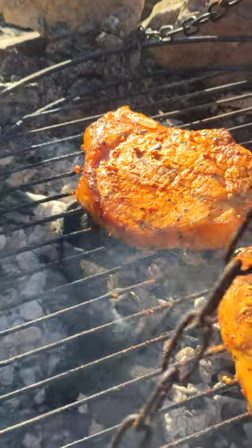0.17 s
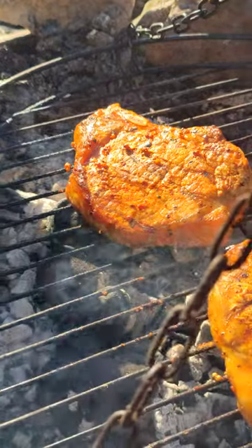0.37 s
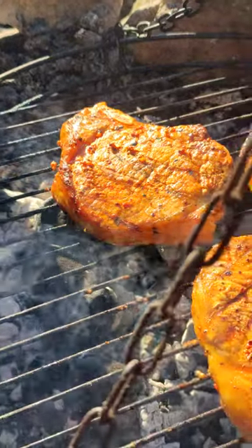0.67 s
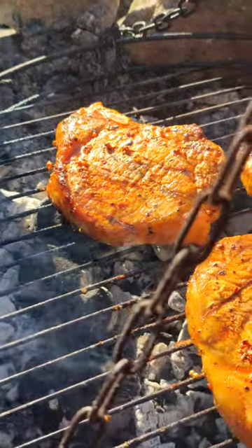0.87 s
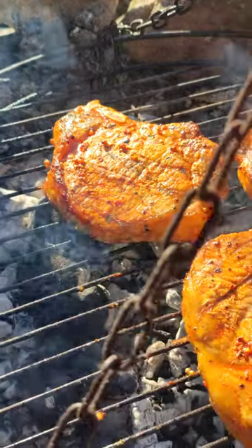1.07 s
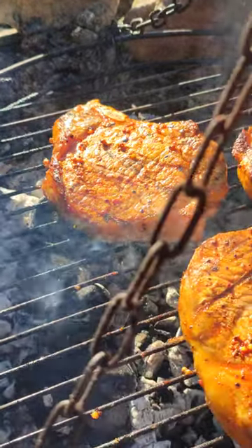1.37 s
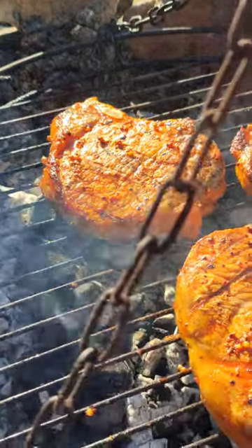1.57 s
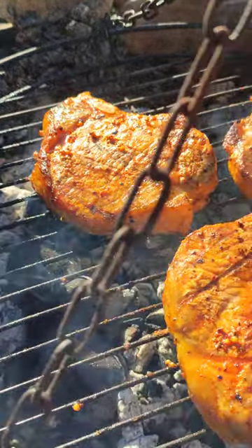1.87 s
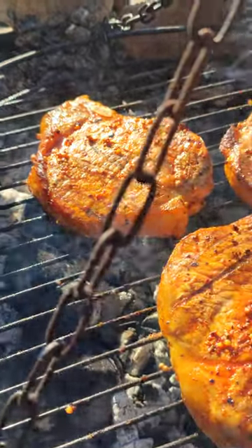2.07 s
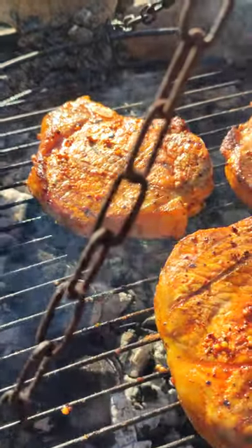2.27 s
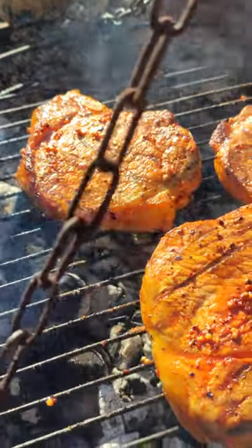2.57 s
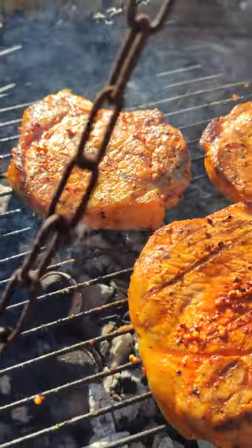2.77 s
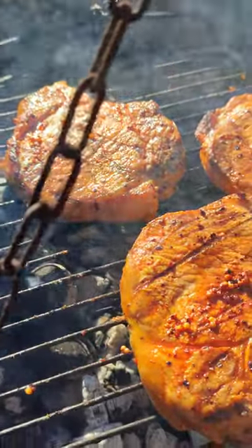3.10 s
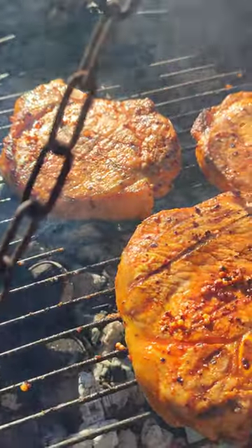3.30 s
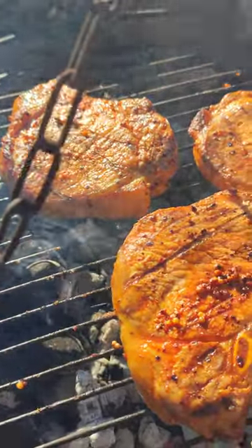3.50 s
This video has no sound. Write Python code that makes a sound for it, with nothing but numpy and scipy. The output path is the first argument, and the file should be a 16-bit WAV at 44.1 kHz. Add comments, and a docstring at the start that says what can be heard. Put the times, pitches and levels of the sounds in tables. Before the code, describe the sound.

Meat sizzles on a charcoal grill outdoors, close to a phone. Brief silence, then a quick fade-in by 0.35 s. Bright fine hiss carries dense, clumpy fat crackle; a loud pop at 0.55 s leads a flurry until 0.77. The sizzle thins around 1.4-2 s with isolated pops, revives near 2.4, gives a loud duller pop at 2.53, then keeps spitting until 3.6 over faint low rumble.

```python
"""Outdoors at a charcoal grill, meat and fat sizzle close to a phone. Coloured noise makes the fine hiss;
many small bursts of fat bubbles make the crackle, and single larger bursts make the louder pops; one faint
click is made like a pop. Each burst is a spike that arrives along several paths, with diffuse echoes. Below
lies a low outdoor rumble of noise. The recorder opens after a moment of silence and fades in, while a slow
offset on its two inputs settles, at first partly in steps."""
import sys
import numpy as np
from scipy import signal
from scipy.fft import rfft, irfft, next_fast_len
from scipy.io import wavfile
from scipy.ndimage import uniform_filter1d, map_coordinates

SR = 44100
rng = np.random.default_rng(int(sys.argv[2]) if len(sys.argv) > 2 else 0)


def to_wav(sig):
    """Store sig (one row per channel, or 1-D mono) as 16-bit WAV at the path in sys.argv[1].

    Samples outside -1..1 are clipped; the rate is SR.
    """
    pcm = np.clip(np.atleast_2d(sig), -1, 1) * 32767
    pcm = np.round(pcm).astype(np.int16)
    wavfile.write(sys.argv[1], SR, pcm.T)  # frames by channels


def attenuation_scalar(level_db):
    """Turn a level in dB into a linear amplitude multiplier (20 dB per decade)."""
    decades = np.asarray(level_db, float) / 20
    return 10 ** decades


N = 160524  # length in samples

# How hard the fat fries, before trims and resonances.
# Each row: time in seconds, hiss level in dB, crackle level over the hiss in dB.
FRYING_OVER_TIME = [(.1, -57, -0.5), (.33, -59.5, -5), (.37, -54.5, 0.5), (.55, -56, -3.5), (.7, -54.5, 0),
                    (0.799, -54, -1.5), (.95, -56, -2), (1.4, -59, -6), (1.6, -60.5, -6.5),
                    (2.15, -58.5, -2.5), (2.35, -55.5, -3.5), (2.45, -56.5, 4.5), (2.65, -57.5, -5),
                    (2.83, -56.5, -3), (3.05, -57, -2), (3.3, -58, 0), (3.64, -56.5, -7)]
# Single pops, and at 0.2783 s a faint click that is no bubble, before the resonances. Each row: start in
# seconds, level in dB, extra left minus right in dB, tilt in dB per octave (three times as much above 9 kHz).
POPS_AND_CLICK = [(.104, -40, 1, 0.5), (.2783, -50.5, -2, -4.5), (0.3509, -41, 2, 0), (0.4418, -48, 2, -1),
                  (0.481, -45.5, -6, -3), (0.547, -30.5, -1.5, 1), (0.5795, -42.5, 2, -2),
                  (0.5844, -44, 0, 1), (0.5971, -48, -8, -1), (0.6002, -46, -1, -1.5),
                  (.6128, -44, -5.5, -8), (0.645, -49.5, 4, -9), (.6592, -47.5, -9, -1),
                  (0.6615, -46.5, -6, 0.5), (.671, -46, 8, 2.5), (0.6816, -40.5, -5, 1),
                  (0.687, -42.5, -2, -2), (0.7127, -43.5, -7, -2), (0.7306, -49, -2, 5),
                  (.7638, -38.5, -0.5, -2.5), (0.7659, -41, -2, -2.5), (.9405, -55, 2, -1),
                  (1.228, -45.5, 0, 0.5), (1.2464, -47, -1, 0.5), (1.274, -38.5, 0.5, 0),
                  (1.3663, -36.5, -1, 0), (1.654, -50.5, 5, -7), (1.8631, -43.5, -3, 1),
                  (1.8754, -45, -0.5, -2), (1.968, -37, 8, 4), (2.3915, -46.5, -2, 0.5),
                  (2.4359, -43.5, 3, -1.5), (2.444, -38, -1, -2), (2.454, -43, -2, 3),
                  (2.462, -42.5, -7.5, -2.5), (2.5264, -29, -1.5, -4), (2.7938, -42.5, 5, 0),
                  (2.8188, -46, -4, -2.5), (2.8255, -41.5, 2, -3), (2.8353, -40, 2, 0.5),
                  (2.9735, -40.5, -3, -0.5), (2.9998, -44, -3, -0.5), (3.0157, -37, 1.5, -0.5),
                  (3.0727, -45, -2, 0.5), (3.1527, -47.5, -4.5, 0), (3.266, -49.5, -9, -1.5),
                  (3.306, -48, -2, 1), (3.3136, -48, -2, -1), (3.3264, -44.5, -2, 0),
                  (3.3924, -46, -4.5, -0.5), (3.6208, -45, -1, -0.5), (3.63, -47, -6, -1)]
# Colour of the hiss. Each row: frequency in Hz, relative level in dB per Hz.
HISS_COLOUR = [(650, -19), (1100, -9), (1330, -17), (1440, -8.5), (2190, -5.5), (3430, -4.5), (4890, -5),
               (6390, -2), (7920, -1), (10400, -8.5), (11900, -4), (14300, -4)]
# Colour of the bursts. Each row: frequency in Hz, relative level in dB per Hz.
BURST_COLOUR = [(200, -24), (950, -15), (1350, -16), (1700, -11.5), (2140, -10.5), (3140, -6), (4490, -6),
                (6300, -0.5), (7700, 3.5), (8600, -1.5), (10200, -8), (13000, -6), (16000, -6.5)]
# Colour of the rumble. Each row: frequency in Hz, relative level in dB per Hz.
RUMBLE_COLOUR = [(12, -28), (20, 0.5), (59, -2), (139, -8), (217, -14.5), (250, -12.5), (309, -22),
                 (457, -20), (508, -25), (793, -25), (1400, -33), (1820, -60), (3080, -120)]
# Body of the rumble, before its drift. Each row: time in seconds, level in dB.
RUMBLE_BODY_LEVEL = [(0.4, -58), (1.41, -59.5), (3.64, -59.5)]
# How alike left and right noise are. Each row: frequency in Hz, likeness (1 is the same, 0 is unrelated).
LEFT_RIGHT_LIKENESS = [(60, 0.97), (180, 0.97), (550, 0.46), (1650, 0.2), (4970, 0.19), (15000, 0.0)]
# Colour difference of the two ports. Each row: frequency in Hz, left minus right in dB.
PORT_COLOUR = [(60, 0), (180, -2), (800, -0.5), (1500, 3.5), (2380, -2.5), (3440, -2.5), (4400, -2),
               (5200, -7), (7700, -1), (8300, 6), (10200, -4.5), (15000, 0.5)]
# Input offset before the fade, a row for left and one for right. Each row: size of the main part, its fall
# time in seconds, size of the opposing part, its fall time in seconds (times to drop to 37 percent).
INPUT_OFFSET = [(0.05, 0.3, 0.007, 1), (0.035, 0.079, 0.003, 0.9)]
# Resonances near the microphone. Each row: frequency in Hz, width in Hz, lift in dB.
BOWL_RESONANCES = [(2120, 230, 2.5), (3130, 130, 2.5), (7600, 160, 2.5), (13100, 200, 3.5)]
# Ways from a burst to the two ports, direct and off meat, grate and bowl, before scatter.
# Each row: delay in seconds, left level in dB, right level in dB.
BURST_PATHS = [(0, -3.5, -2.5), (.0005, -13.5, 0), (.0009, -7.5, -7.5), (.0012, -1.5, -11.5),
               (.0037, -17, -15), (.007, -22, -22)]

CRACKLES_PER_S, CRACKLE_SPREAD_DB, CLUMP_DB = 800, 3.5, 3  # average rate, size scatter, clump strength
CRACKLE_HZ = (2940, 12700)  # lowest and highest crackle centre
CRACKLE_OCTAVES = 1.1  # a crackle falls 20 dB over this distance from its centre
TILT_HZ = 6500  # pivot of a pop's tilt
SPIKE = 12  # spike height against the echo noise, before the path levels
HOLD_S, RING_T60_S = 0.0013, 0.0071  # dense echoes: steady time, then time to fall 60 dB
TAIL_DB, TAIL_T60_S = -14, 0.088  # faint echo tail: level under the dense part, time to fall 60 dB
PATH_SCATTER_S, PATH_SPREAD_DB = 0.00003, 2.5  # random change of path delay and level per burst
PORT_LAG = 3  # samples by which the right port hears each spike later
OPEN_S, FADE_S, FADE_BEND = 0.0845, 0.26, 0.86  # silence, fade length, power of the fade curve
STEP_S, STEPS_UNTIL_S = 0.06, 0.24  # step length, end of the steps after opening
STEP_SHARE = (1, 0.5)  # how fully the offset moves in steps, left and right
TOP_HZ, ABOVE_TOP_DB = 14280, -45  # band limit and final level above it


def frying():
    """Fat frying: hiss and crackle both follow how hard it fries."""
    times, *levels = np.transpose(FRYING_OVER_TIME)
    hiss_db, crackle_db = (np.interp(np.arange(N) / SR, times, level) for level in levels)
    fine_hiss = hiss(hiss_db + 2)
    return fine_hiss + attenuation_scalar(hiss_db - 1.0 + crackle_db) * crackle()


def hiss(level_db):
    """Fine sizzle: coloured noise whose level flickers a little."""
    flicker_db = 0.15 * wobble(9.6) + wobble(50)
    return attenuation_scalar(level_db + flicker_db) * rush(HISS_COLOUR, patchy_db=1.5)


def crackle():
    """Small bubble bursts in clumps, with scattered sizes, pitches and places, scaled to rms 1."""
    chance, size, kind, pan = rng.random((4, N))
    kernels = bursts(count=14)
    size_db = -CRACKLE_SPREAD_DB * np.log(size + 0.0095)  # few large, many small
    hits = (chance < CRACKLES_PER_S / SR) * attenuation_scalar(size_db + CLUMP_DB * wobble(60))
    kinds = (kind * len(kernels)).astype(int)
    sides = np.array([0.5 + pan, 1.5 - pan])  # left and right gain of each hit
    two_octaves_db = 2 * -20 / CRACKLE_OCTAVES
    out = np.zeros((2, N))
    for k, centre in enumerate(np.geomspace(*CRACKLE_HZ, len(kernels))):
        colour = [(centre / 4, two_octaves_db), (centre, 0), (centre * 4, two_octaves_db)]
        kernel = unit(causal(kernels[k], colour))
        own_hits = (hits * (kinds == k))[None] * sides
        out += signal.fftconvolve(own_hits, kernel, axes=1)[:, :N]
    return unit(causal(out, BURST_COLOUR))


def pops_and_click():
    """Larger bubbles bursting, and one faint click shaped like them, each with its own brightness and place."""
    out = np.zeros((2, N + SR))
    for (start, db, pan_db, tilt_db), burst in zip(POPS_AND_CLICK, bursts(count=len(POPS_AND_CLICK))):
        colour = []
        for hz, level in BURST_COLOUR:
            octaves = np.log2(max(hz, 2000) / TILT_HZ)
            steeper = 3 if hz > 9000 else 1
            colour.append((hz, level + tilt_db * octaves * steeper))
        burst = causal(burst, colour)
        burst = burst / np.sqrt(np.mean(burst[:, :SR // 500] ** 2))  # level counts over the first 2 ms
        gain = attenuation_scalar(db + np.array([[0.5], [-0.5]]) * pan_db)
        out[:, round(start * SR):][:, :burst.shape[1]] += gain * burst
    return out[:, :N]


def bursts(count):
    """Stereo bursts: a spike arriving along several paths, over diffuse echoes and a faint tail."""
    t = np.arange(SR // 25) / SR
    dense = attenuation_scalar(-60 * np.maximum(t - HOLD_S, 0) / RING_T60_S)
    shape = dense + attenuation_scalar(TAIL_DB - 60 * t / TAIL_T60_S)
    # the extra noise values at the end scatter the paths
    noise = rng.standard_normal((count, 2, len(t) + 2 * len(BURST_PATHS)))
    out = noise[..., :len(t)] * shape
    for k, (delay, *side_db) in enumerate(BURST_PATHS):
        arrival = delay + PATH_SCATTER_S * noise[:, 0, -1 - 2 * k]
        at = np.round(abs(SR * arrival)).astype(int)
        for side in range(2):
            level_db = side_db[side] + PATH_SPREAD_DB * noise[:, side, -2 - 2 * k]
            out[np.arange(count), side, at + side * PORT_LAG] += SPIKE * attenuation_scalar(level_db)
    return out


def rumble():
    """Distant traffic and air: noise with a steady deep part and a body that drifts in level."""
    both = rush(RUMBLE_COLOUR, patchy_db=0.5)
    deep = filtered(both, lambda hz: hz < 100)
    body_db = np.interp(np.arange(N) / SR, *np.transpose(RUMBLE_BODY_LEVEL)) + 1.3 * wobble(2.7)
    return attenuation_scalar(-55.0) * unit(deep) + attenuation_scalar(body_db) * unit(both - deep)


def rush(spectrum, patchy_db):
    """Coloured stereo noise of rms 1, with patches of random gain over time and frequency."""
    z = signal.stft(rng.standard_normal((2, N)), nperseg=512)[2]
    field = uniform_filter1d(rng.standard_normal(z.shape[1:]), size=6, axis=0)
    field = uniform_filter1d(field, size=8, axis=1)
    pair = signal.istft(z * attenuation_scalar(patchy_db * unit(field)), nperseg=512)[1][:, :N]

    def response(hz):
        # sharing power between middle and side sets how alike left and right are
        angle = np.arccos(np.clip(along(LEFT_RIGHT_LIKENESS, hz), -1, 1)) / 2
        return attenuation_scalar(along(spectrum, hz)) * [np.cos(angle), np.sin(angle)]
    mid, side = filtered(pair, response)
    return unit(np.array([mid + side, mid - side]))


def causal(x, spectrum):
    """Colour x with a minimum-phase filter, so nothing rings before a hit."""
    def response(hz):
        cepstrum = irfft(np.log(np.maximum(attenuation_scalar(along(spectrum, hz)), 1e-4)))
        cepstrum[1:len(hz) - 1] *= 2  # folding it forward in time gives minimum phase
        cepstrum[len(hz):] = 0
        gain = np.exp(rfft(cepstrum))
        return gain / np.sqrt(np.mean(abs(gain) ** 2))
    return filtered(x, response)


def filtered(x, response):
    """Multiply the spectrum of x by a response given as a function of frequency in Hz."""
    m = next_fast_len(x.shape[-1] + 8192)
    return irfft(rfft(x, m) * response(np.fft.rfftfreq(m, 1 / SR)), m)[..., :x.shape[-1]]


def along(points, hz):
    """Read a curve of (Hz, value) points on a log frequency axis."""
    f, v = np.transpose(points)
    return np.interp(np.log(hz + 1), np.log(f + 1), v)


def wobble(rate):
    """A smooth random curve through rate random points a second."""
    return map_coordinates(rng.standard_normal(int(N * rate / SR) + 4), [np.arange(N) * rate / SR])


def unit(x):
    """Scale to rms 1."""
    return x / np.sqrt(np.mean(x ** 2) + 1e-20)


def bowl_lift(hz):
    """Resonances near the microphone: each adds a band-pass peak to the direct sound."""
    lift = 1
    for centre, width, db in BOWL_RESONANCES:
        damping = 1j * hz * width
        lift = lift + (attenuation_scalar(db) - 1) * damping / (centre * centre - hz * hz + damping)
    return lift


def scene():
    """The frying, pops and click are lifted at the resonances; the rumble comes from afar."""
    return filtered(frying() + pops_and_click(), bowl_lift) + rumble()


def input_offset(t):
    """Slow offset on the two inputs that dies away, at first partly in steps."""
    waiting = (t % STEP_S) * (t < STEPS_UNTIL_S)  # time since the last step
    sides = []
    for (size, fall, opposing, back), share in zip(INPUT_OFFSET, STEP_SHARE):
        main = size * np.exp(-(t - share * waiting) / fall)
        sides.append(main - opposing * np.exp(-t / back))
    return np.array(sides)


def band_limit(hz):
    """Gain that drops steeply above the top frequency."""
    depth = np.clip((hz - TOP_HZ) / 500 + 0.19, 0, 1) * (hz > TOP_HZ)
    return attenuation_scalar(ABOVE_TOP_DB * depth)


def roll_off(x):
    """The treble ends steeply here."""
    return signal.sosfilt(signal.butter(12, 15610, fs=SR, output="sos"), x)


def record(dry):
    """The recorder: port colour, settling offset, silence and fade-in, band limit."""
    t = np.maximum(np.arange(N) / SR - OPEN_S, 0)  # time since opening
    ports = filtered(dry, lambda hz: attenuation_scalar(along(PORT_COLOUR, hz) * np.array([[0.5], [-0.5]])))
    fade = np.clip((t + 0.0039) / FADE_S, 0, 1) ** FADE_BEND * (t > 0)
    limited = filtered((ports + input_offset(t)) * fade, band_limit)
    return roll_off(limited * (t > 0))


dry = scene()
out = record(dry)
to_wav(out)
```